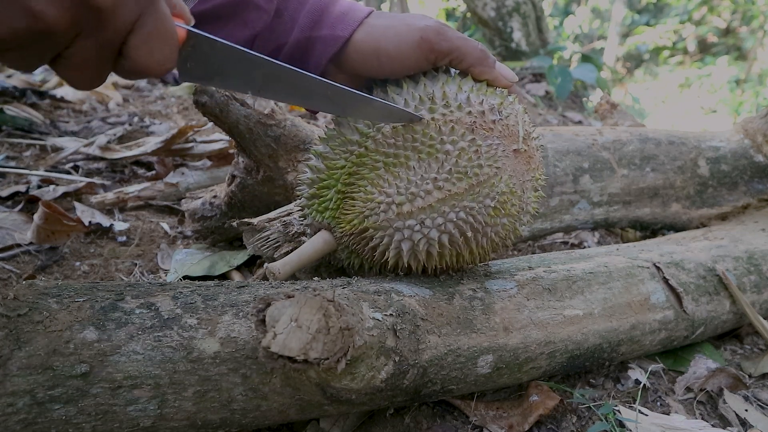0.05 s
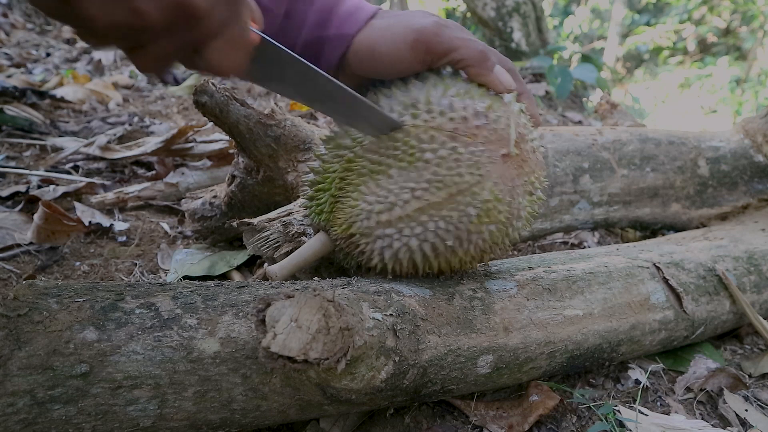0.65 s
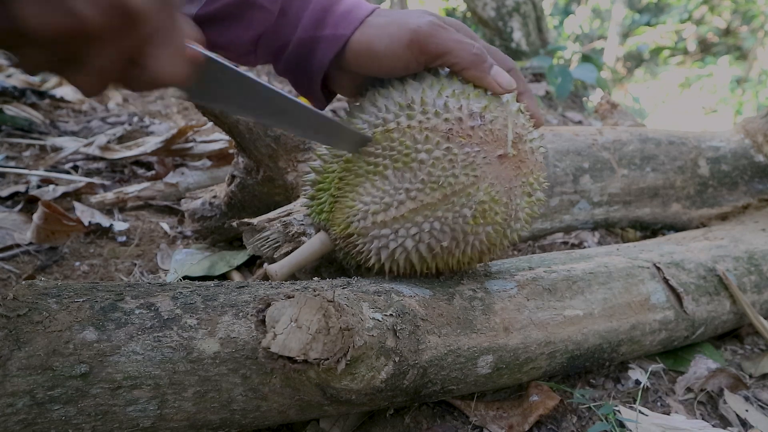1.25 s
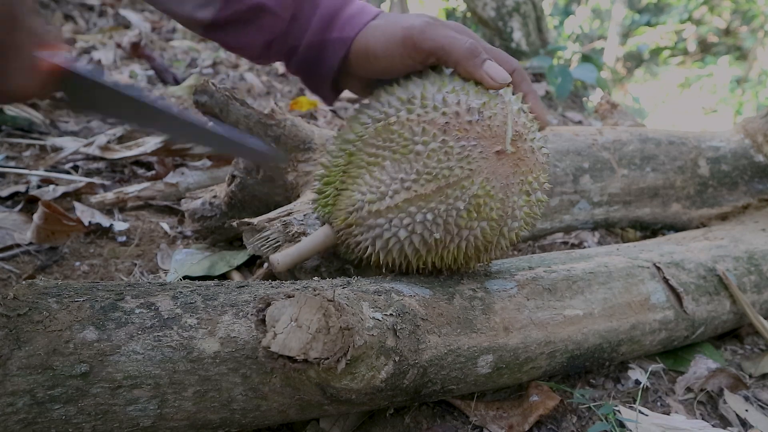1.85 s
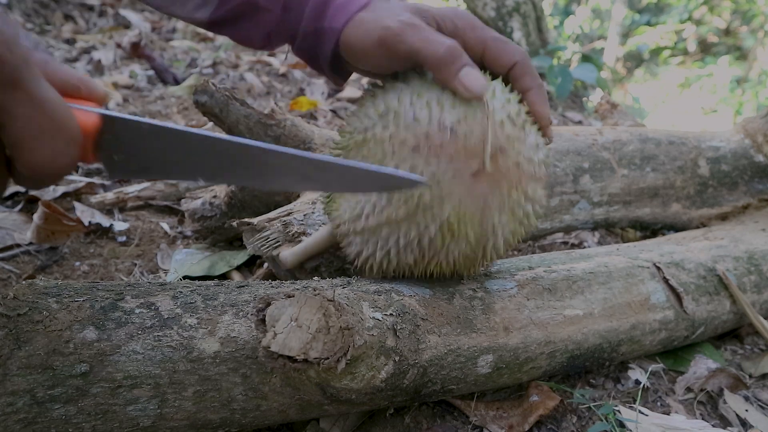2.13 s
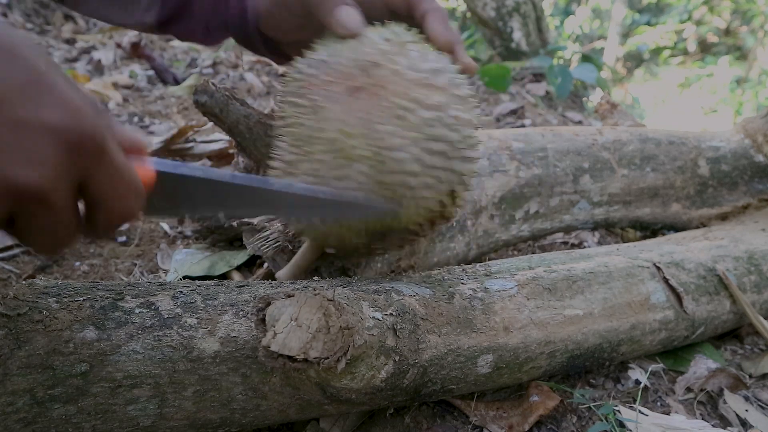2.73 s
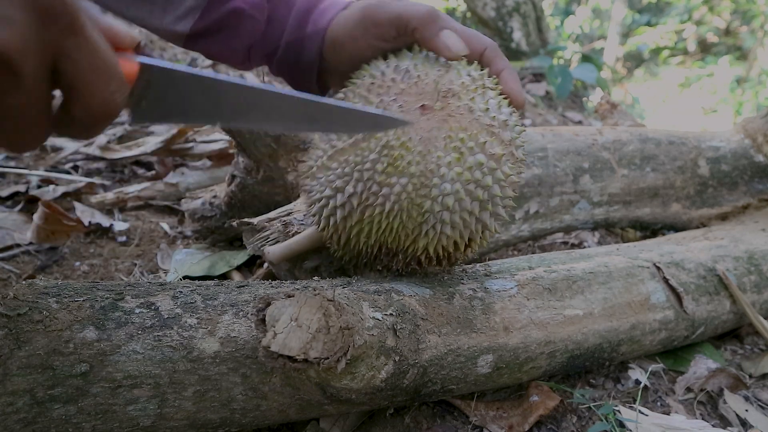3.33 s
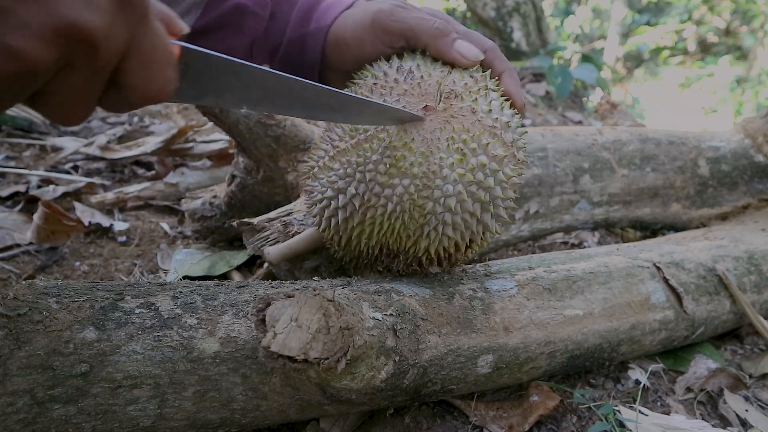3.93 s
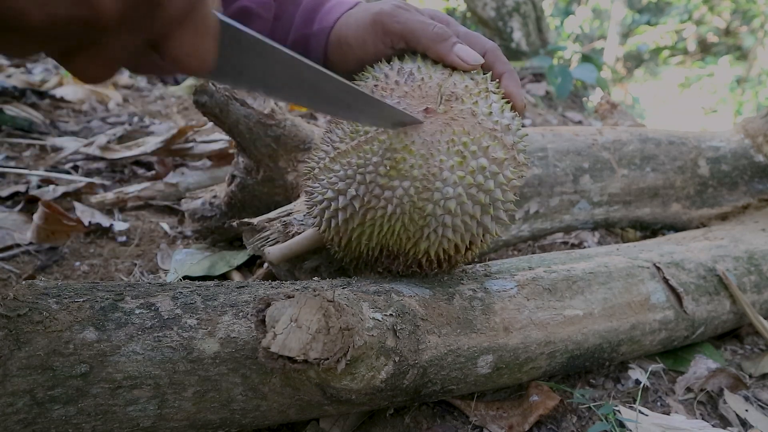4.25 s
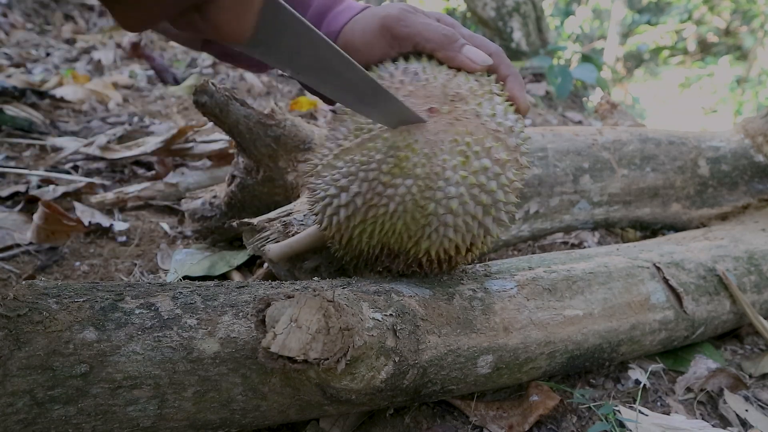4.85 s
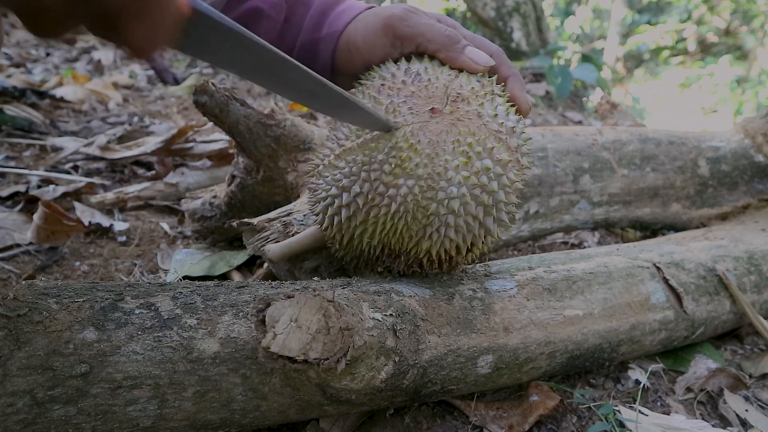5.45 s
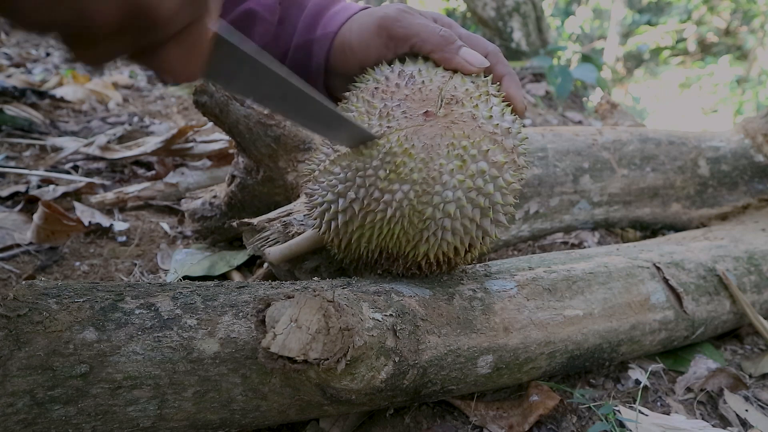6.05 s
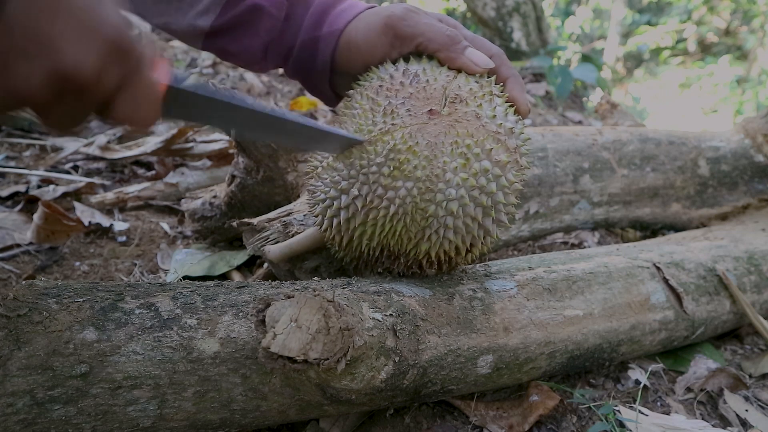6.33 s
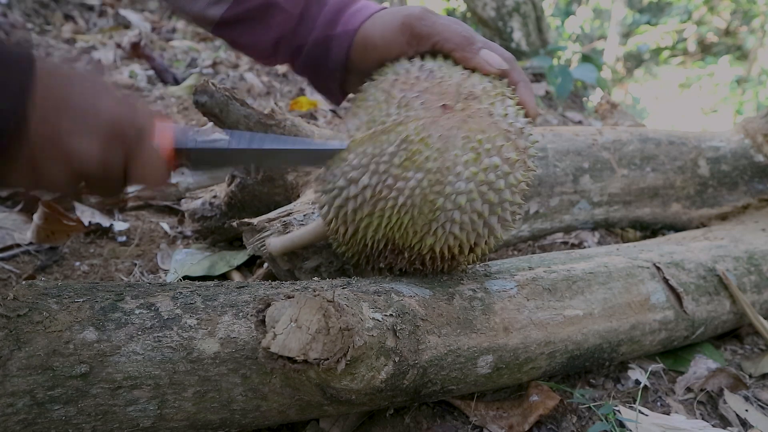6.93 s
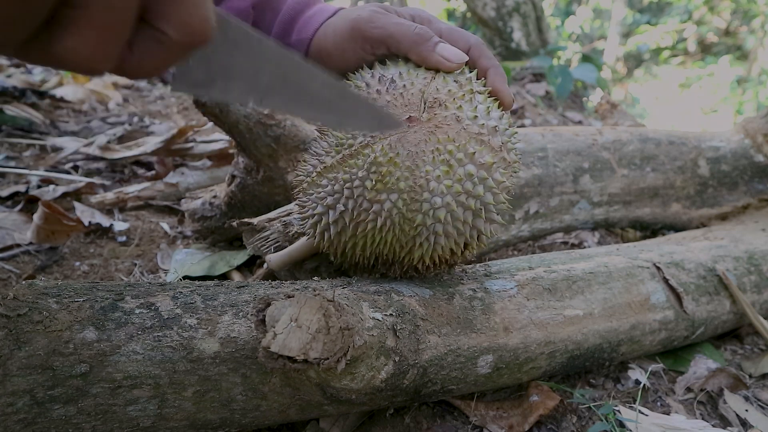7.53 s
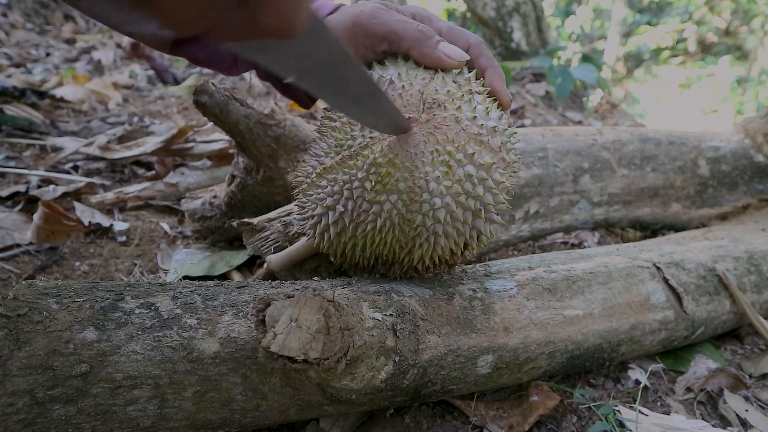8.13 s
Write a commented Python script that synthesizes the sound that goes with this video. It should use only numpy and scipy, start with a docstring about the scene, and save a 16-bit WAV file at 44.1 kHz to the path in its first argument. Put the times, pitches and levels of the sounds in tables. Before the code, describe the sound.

Brief crunching cracks of a blade cutting thick durian husk outdoors, with low thuds as the fruit rocks on logs.

```python
"""Short, woody crunches: a knife hacks and saws into the thick, spiny husk of a durian resting on logs.
In each stroke spines crackle, fibres snap and ring the husk, and the push rocks the fruit with a low thud.
Midway the fruit is turned over, scuffing and bumping on the bark.
Faint handling ticks and the steady hiss of a forest lie behind it."""
import sys
import numpy as np
from scipy import signal
from scipy.fft import rfft, irfft
from scipy.io import wavfile
from scipy.ndimage import uniform_filter1d, minimum_filter1d

SR = 44100
rng = np.random.default_rng(int(sys.argv[2]) if len(sys.argv) > 2 else 0)


def bounce(signal):
    """Save signal as a 16-bit WAV file at the path given by the first command-line argument."""
    frames = np.transpose(np.atleast_2d(signal))
    limited = np.clip(frames, -1, 1)
    pcm = np.round(limited * 32767).astype(np.int16)
    wavfile.write(sys.argv[1], SR, pcm)


N = 361619

# The knife's cue list. Each row: start in seconds, length in seconds, fastest point as a share of
# the length, level in dB, blade depth from 0 to 1, push on the fruit in dB, spot on the husk.
KNIFE_STROKES = [ (0.238, 0.084, 0.4, -37.5, 0, -60, "flank"),
                 (0.334, 0.068, 0.54, -31.5, 0.04, -45, "flank"),
                 (.631, 0.075, 0.53, -15.5, 0, -35, "flank"), (0.906, .084, 0.81, -19, 0.33, -40, "flank"),
                 (1.185, 0.068, 0.78, -10, 0.46, -52, "flank"), (1.335, 0.093, 1, -48, 0, -53, "tips"),
                 (1.458, 0.073, 0.57, -12, 0.83, -38.5, "flank"),
                 (1.739, 0.066, 0.53, -16.5, .95, -43, "flank"),
                 (2.563, 0.079, 0.73, -36, 0.09, -47, "tips"),
                 (4.345, 0.054, 0.46, -31.5, 0.26, -45.5, "crown"),
                 (4.673, .047, 0.6, -25.5, 0.2, -39, "crown"), (5.02, 0.066, .16, -29, 0, -37.5, "crown"),
                 (5.64, 0.077, 0.61, -34.5, 0.14, -43.5, "crown"),
                 (5.967, .071, .8, -18, 0.11, -25.5, "crown"), (6.151, 0.13, 0.96, -44.5, 0, -57, "tips"),
                 (6.271, 0.11, .66, -30.5, 0, -41.5, "stem"), (6.6, 0.085, .52, -25, 0.05, -40, "stem"),
                 (6.856, 0.083, 0.48, -18, 0.11, -55, "stem"),
                 (7.072, 0.037, .47, -34.5, 0.01, -60, "stem")]


def knife(husk, logs, bite_db=-15, push_lead_s=0.0327):
    """Each stroke snaps a first spine, crunches in, and rocks the fruit just before the blade is fastest."""
    for start, length, peak_share, db, depth, push_db, spot in KNIFE_STROKES:
        add(husk, *snap(start, db + bite_db))
        add(husk, *crunch(start, length, peak_share, db, depth, spot))
        add(logs, *thud(start + peak_share * length - push_lead_s, push_db))


# The voice of each spot. Each row: swell, crackle level in dB; spine ping in Hz and in dB against the
# crackle; rub in dB; then pitch in Hz and level in dB, at zero depth, for hollow, cut flap and rind.
HUSK_VOICES = { "flank": (14, -6, 2850, -18.5, -11.5, 653, -6, 1282, -7, 1483, -4.5),
               "crown": (7.5, -2.5, 3594, -13, -19, 679, -8, 978, -2, 1396, -11),
               "stem": (12, -2, 2347, -23, -11.5, 162, -23, 975, -7, 1588, -1.5),
               "tips": (11, 1, 3700, -11, -12, 680, -24, 1050, -22, 2200, -13),
               "bark": (16, -3, 2400, -24.5, -7.5, 480, -15, 1050, -10, 1500, -9)}
# The tone of crackling spines. Each row: frequency in Hz, gain in dB.
CRACKLE_EQ = [(60, -8.5), (130, -6.5), (260, -8.5), (600, -3), (1000, 5), (1700, 1), (2400, 3.5),
              (3700, -2), (4800, -3.5), (6400, -12), (7800, -10), (10500, -10), (13000, -16.5),
              (16000, -18)]
# What rings as the blade binds, from the whole fruit up to the steel.
# Each row: pitch in Hz, width in Hz, level in dB against the spot's rub.
RUB_RESONANCES = [(402, 350, -3), (2650, 700, -4.5), (4680, 960, -4.5), (8100, 1700, -10), (9900, 3500, -9)]


def crunch(start, length, peak_share, db, depth, spot):
    """A scrape swells and stops; spines crackle while coarser fibres snap and ring the husk."""
    (swell_db, crackle_db, ping_hz, ping_db, rub_db,
     hollow_hz, hollow_db, flap_hz, flap_db, rind_hz, rind_db) = HUSK_VOICES[spot]
    crackle_db -= 17.5 * depth  # a buried blade meets fewer spines,
    hollow_db -= depth  # damps the hollow,
    hollow_hz *= 1 + 0.19 * depth  # stiffens it,
    flap_hz *= 1 - 0.14 * depth  # cuts a longer flap
    rind_hz *= 1 - 0.12 * depth  # and rings the rind lower
    end = start + length
    t = np.arange(start - 0.015, end + 0.032, 1 / SR)
    off_peak = np.interp(t, [start, start + min(peak_share, 1) * length, end], [1, 0, 1])
    fade_db = 2500 * np.maximum(start - t, 0) + 1400 * np.maximum(t - end, 0)
    force = amp(-swell_db * off_peak ** 1.64 - fade_db)
    jerky = force * stick_slip(len(t))
    spines = unit_rms(jerky * clicks(len(t), per_s=5000, spread_db=4))
    fibres = unit_rms(jerky * clicks(len(t), per_s=800, spread_db=-2.5))
    rubbing = force * clicks(len(t), per_s=3500, spread_db=5.5)
    ping = amp(ping_db) * ring(spines, ping_hz, 0.21 * ping_hz)  # spine length sets the pitch
    sound = amp(crackle_db) * unit_rms(colour(spines, CRACKLE_EQ) + ping)
    pull = fibres + 1.1 * unit_rms(rubbing)
    sound += amp(hollow_db) * ring(pull, hollow_hz, width_hz=0.39 * hollow_hz)
    sound += amp(flap_db) * ring(pull, flap_hz, width_hz=296)
    sound += amp(rind_db) * ring(pull, rind_hz, width_hz=490)
    for hz, width_hz, level_db in RUB_RESONANCES:
        sound += amp(rub_db + level_db) * ring(rubbing, hz, width_hz)
    return t[0], amp(db) * sound * np.sqrt(np.mean(force ** 2))


def stick_slip(count, per_s=150, spread_db=2.5, fade_s=0.0027, steady=0.66):
    """The blade sticks and slips: each uneven jerk lets go a clump of breaks."""
    jerks = abs(clicks(count, per_s, spread_db))
    return steady + unit_rms(signal.lfilter([1], [1, -np.exp(-1 / (fade_s * SR))], jerks))


# The sharp accents. Each row: time in seconds, peak in dB, rind knock in dB against the splinters.
SINGLE_SNAPS = [ (0.124, -31, -3), (.228, -27.5, 6), (.298, -24.5, -16), (.631, -14.5, 3), (.69, -7.5, 1),
                (.962, -10, 9), (.968, 8, -12), (1.5131, -3.5, 14), (1.5254, -5, 24), (1.7728, -3.5, 9),
                (1.784, -3, 28), (1.792, -6, 13), (1.929, -25.5, 0), (2.31, -21.5, 2), (2.6181, -19.5, -28),
                (2.6542, -19.5, -15), (2.688, -14.5, -2), (2.691, -18.5, 18), (2.862, -25, 7),
                (2.966, -31.5, -18), (4.4093, -21, -7), (5.0004, -24, -6), (5.0125, -11.5, -4.5),
                (5.4143, -35, -20), (5.6616, -20.5, -3), (5.6775, -22, 12), (6.025, -11, -15),
                (6.109, -26.5, -20), (6.119, -28, -25), (6.141, -26, -9), (6.2776, -15, -18),
                (6.3385, -16, -7.5), (6.6261, -14, -4), (6.6418, -14.5, -1), (6.6774, -4.5, -13),
                (6.847, -26, -8), (6.873, -12, -6), (6.911, -12, -5), (7.849, -34, -8)]


def breaking_spines(husk):
    """Single spines and fibres break; the deep ones ring the rind."""
    for s, peak_db, knock_db in SINGLE_SNAPS:
        add(husk, *snap(s, peak_db, knock_db))


# The tone of splintering. Each row: frequency in Hz, gain in dB.
SPLINTER_EQ = [(100, -6.5), (400, -0.5), (1500, 9), (4500, 0), (6500, -4), (8500, -2), (12000, -8.5),
               (16000, -5)]


def snap(s, peak_db, knock_db=-2, rind_hz=1274, hollow_hz=710, knock_t60=0.012, debris_t60=0.06):
    """One spine gives way: a burst of splinters, a little debris, a knock of the rind and its hollow."""
    t = np.arange(SR // 20) / SR
    burst_t60 = 0.009 * 0.5 ** (peak_db / 35)  # louder snaps die faster
    burst = amp(-60 * np.maximum(t - 0.0006, 0) / burst_t60)
    debris = amp(-28 - 60 * t / debris_t60)
    splinters = rng.standard_normal(len(t)) * (burst + debris)
    knock = np.sin(2 * np.pi * rind_hz * t) + amp(-11) * np.sin(2 * np.pi * hollow_hz * t)
    knock *= amp(-60 * t / knock_t60)
    knock = signal.lfilter(*signal.butter(2, 450, "high", fs=SR), knock)  # a small patch gives no bass
    sound = colour(splinters, SPLINTER_EQ) + amp(knock_db) * unit_rms(knock)
    return s, amp(peak_db) * sound / abs(sound).max()


# The low end of fruit on logs. Each row: pitch in Hz, level in dB, t60 in seconds for a soft push.
ROCKING_MODES = [(50.9, -0.5, 0.41), (71.6, -8.5, 0.28), (161, -31, .1)]


def thud(s, push_db, rise_s=0.03, soft_push_db=-34, halving_db=19):
    """A push sets the heavy fruit and logs swinging; hard pushes grind on the bark and die sooner."""
    t = np.arange(SR * 3 // 4) / SR
    rise = np.sin(np.pi / 2 * np.minimum(t / rise_s, 1)) ** 2
    age = np.maximum(t - rise_s, 0) * 2 ** ((push_db - soft_push_db) / halving_db)
    swing = sum(amp(db - 60 * age / t60) * np.sin(2 * np.pi * hz * t) for hz, db, t60 in ROCKING_MODES)
    rumble = ring(rng.standard_normal(len(t)), ROCKING_MODES[0][0], width_hz=28)
    grind = amp(-15.5 - 60 * age / 0.6) * rumble
    return s, amp(push_db) * rise * (swing + grind)


# The fruit's moves on the logs. Each row: time in seconds, thud in dB, scuff in dB.
FRUIT_MOVES = [(2.221, -49, -44), (2.285, -47, -44), (2.66, -22.5, -34), (2.848, -41, -39),
               (3.174, -33.5, -47), (4.415, -43, -45.5), (6.701, -46, -49.5)]


def settling_fruit(husk, logs, thud_lead_s=0.013):
    """The fruit tips and settles: its weight shifts, then its spines scuff the bark."""
    for s, thud_db, scuff_db in FRUIT_MOVES:
        add(husk, *crunch(s, length=0.088, peak_share=0.16, db=scuff_db, depth=0, spot="bark"))
        add(logs, *thud(s - thud_lead_s, thud_db))


def handling(level_db=-65):
    """Faint ticks of spines against hand, blade and bark, softer while the blade rests."""
    activity = np.interp(np.arange(N) / SR, [0, 2.9, 3.6, 4.2, 6.3, 7.2, 7.5],
                         [0.26, 0.91, 0.26, 0.2, 0.93, 0.98, 0.36])
    ticks = clicks(N, per_s=70, spread_db=2) * activity
    t = np.arange(SR // 100) / SR
    splinter = rng.standard_normal(len(t)) * np.exp(-t / 0.0005)
    return amp(level_db) * colour(signal.oaconvolve(ticks, splinter)[:N], SPLINTER_EQ)


# The decay of the outdoor tail. Each row: frequency in Hz, t60 in seconds.
TAIL_DECAY = [(100, 0.25), (1000, 0.055), (4000, 0.14), (14000, 0.1)]


def scatter(x, level_db=-23, echoes_per_s=2500, rise_s=0.0026):
    """Logs and trees throw back a thin, short tail whose bass lasts longest."""
    echoes = rng.standard_normal(SR // 2) * (rng.random(SR // 2) < echoes_per_s / SR)
    hz, t, spectrum = signal.stft(echoes, SR, nperseg=256)
    decay = amp(-60 * t / curve_at(TAIL_DECAY, hz)[:, None])
    tail = signal.istft(spectrum * decay * np.minimum(t / rise_s, 1), SR, nperseg=256)[1]
    return amp(level_db) * signal.oaconvolve(x, tail / np.linalg.norm(tail))[:N]


# The tone of the forest bed. Each row: frequency in Hz, gain in dB.
FOREST_EQ = [(25, -12), (50, -7.5), (100, -3.5), (200, -3.5), (400, -3.5), (650, -4), (1100, 0),
             (1600, -4.5), (2500, -5.5), (5000, -9.5), (8000, -17), (10000, -22.5), (16000, -26.5)]
# Its slow fader ride. Each row: time in seconds, level in dB.
FOREST_FADER = [(0, -47.5), (1.9, -46), (2.45, -48), (3.25, -46.5), (3.7, -48.5), (7.1, -49), (7.5, -52),
                (8.2, -52)]


def forest(patchy_db=1.7):
    """Distant leaves hiss, drifting in soft patches."""
    hz, _, spectrum = signal.stft(rng.standard_normal(N), SR, nperseg=4096)
    patches = uniform_filter1d(rng.standard_normal(spectrum.shape), size=12, axis=0)
    patches = unit_rms(uniform_filter1d(patches, size=4, axis=1))
    spectrum *= amp(curve_at(FOREST_EQ, hz)[:, None] + patchy_db * patches)
    hiss = unit_rms(signal.istft(spectrum, SR, nperseg=4096)[1][:N])
    return hiss * amp(np.interp(np.arange(N) / SR, *np.transpose(FOREST_FADER)))


# The stereo width. Each row: frequency in Hz, side against mid in dB.
STEREO_WIDTH = [(30, -46), (60, -42), (125, -17), (250, -13.5), (500, -22), (1000, -79), (2200, -77),
                (4000, -71), (8000, -40), (13000, -19)]
# The tone of the noise floor. Each row: frequency in Hz, gain in dB.
MIC_NOISE_EQ = [(30, -10), (130, -12), (320, 1), (700, 5), (1300, -7), (2300, -22), (3700, -37),
                (5000, -12), (16000, -25)]


def microphone_pair(mid, noise_db=-73):
    """Two close microphones hear the same level at slightly different phase and add faint noise."""
    width = amp(curve_at(STEREO_WIDTH, np.fft.rfftfreq(N, 1 / SR)))
    side = irfft(1j * rfft(mid) * width, N)
    side += amp(noise_db) * colour(rng.standard_normal(N), MIC_NOISE_EQ)
    return np.array([mid + side, mid - side])


def clicks(count, per_s, spread_db):
    """Clicks of uneven size and sign, one at a random place in each short slot of time."""
    slots = int(count * per_s / SR)
    place, size, sign = rng.random((slots, 3)).T
    positions = ((np.arange(slots) + place) * SR / per_s).astype(int)
    train = np.zeros(count)
    train[positions] = np.sign(sign - 0.5) * amp(-spread_db * np.log(size + 0.022))
    return train


def ring(x, hz, width_hz):
    """A damped resonance with steep skirts, at rms 1."""
    b, a = signal.iirpeak(hz, hz / width_hz, SR)
    return unit_rms(signal.lfilter(b, a, signal.lfilter(b, a, x)))


def colour(x, eq, size=2048):
    """Minimum-phase EQ that keeps the attack of clicks sharp, at rms 1."""
    log_gain = np.log(amp(curve_at(eq, abs(np.fft.fftfreq(size, 1 / SR)))))
    taps = np.fft.ifft(np.exp(np.conj(signal.hilbert(log_gain)))).real
    return unit_rms(signal.fftconvolve(x, taps[:size // 2])[:len(x)])


def curve_at(points, hz):
    """Reads a table on a log-frequency axis."""
    point_hz, value = np.transpose(points)
    return np.interp(np.log(hz + 1), np.log(point_hz + 1), value)


def amp(db):
    """Decibels to gain."""
    return 10 ** (np.asarray(db) / 20)


def unit_rms(x):
    """Scales to rms 1."""
    return x / np.sqrt(np.mean(x ** 2) + 1e-20)


def add(mix, s, sound):
    """Mixes a sound in, starting at s seconds."""
    part = mix[max(round(s * SR), 0):][:len(sound)]
    part += sound[:len(part)]


def scene():
    """Crunches and snaps up front with a short tail, dry thuds underneath, the forest behind."""
    husk, logs = np.zeros(N), np.zeros(N)
    knife(husk, logs)
    settling_fruit(husk, logs)
    breaking_spines(husk)
    return microphone_pair(husk + scatter(husk) + logs + handling() + forest())


def record(dry, ceiling_db=-1.0, deepest_db=6, recover_db_per_s=40, lag_s=0.0022, cutoff_hz=16000):
    """A limiter ducks on the hardest cracks, holds and recovers; a low-pass trims the top."""
    over_db = np.clip(20 * np.log10(abs(dry).max(0) + 1e-9) - ceiling_db, 0, deepest_db)
    half_hold = SR // 10
    held_db = -minimum_filter1d(-over_db, size=2 * half_hold + 1, origin=half_hold)
    recovery_db = np.arange(N) * recover_db_per_s / SR
    duck_db = np.maximum.accumulate(held_db + recovery_db) - recovery_db
    pole = np.exp(-1 / (lag_s * SR))  # too slow for the first peaks, which clip
    gain = amp(-signal.lfilter([1 - pole], [1, -pole], duck_db))
    lowpass = signal.firwin(511, cutoff_hz, window=("kaiser", 9), fs=SR)
    return signal.oaconvolve(np.clip(dry * gain, -1, 1), lowpass[None], "same")


dry = scene()
out = record(dry)
bounce(out)
```